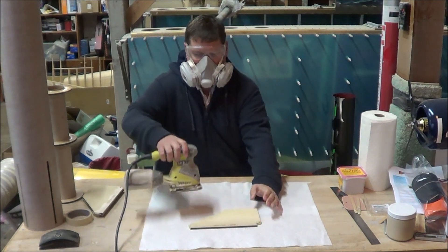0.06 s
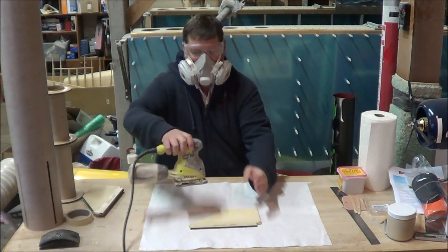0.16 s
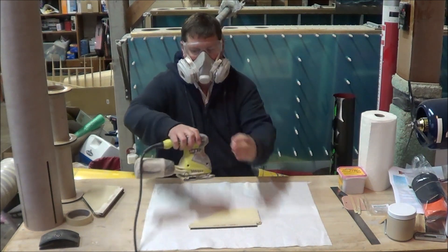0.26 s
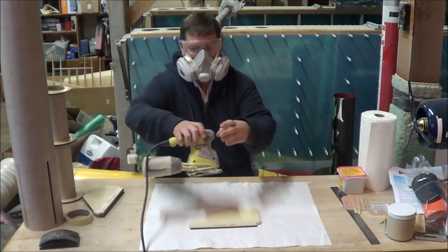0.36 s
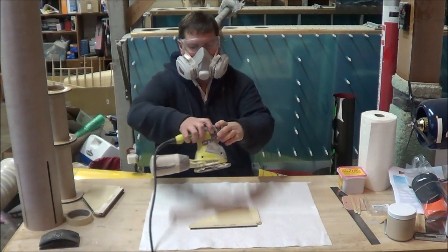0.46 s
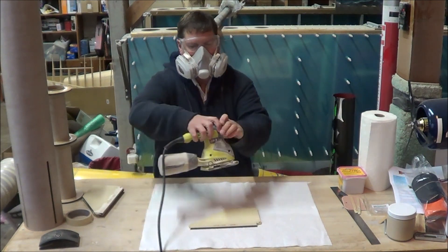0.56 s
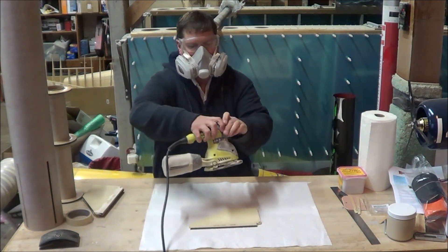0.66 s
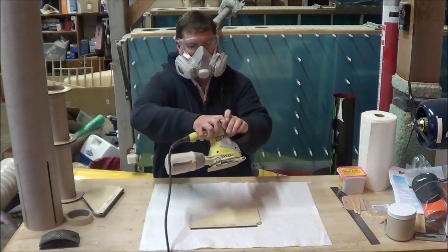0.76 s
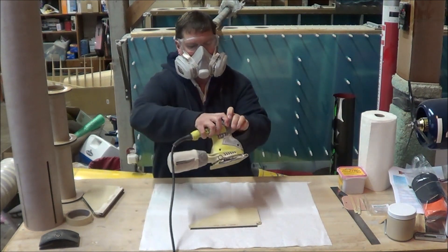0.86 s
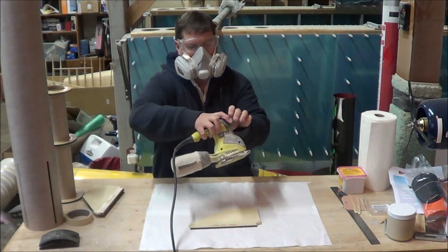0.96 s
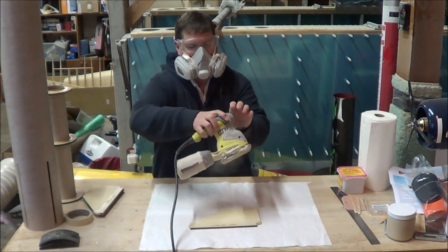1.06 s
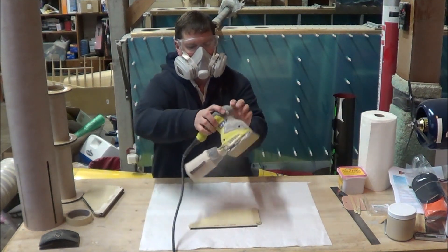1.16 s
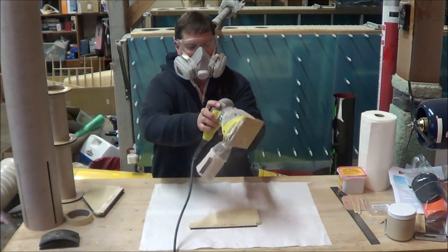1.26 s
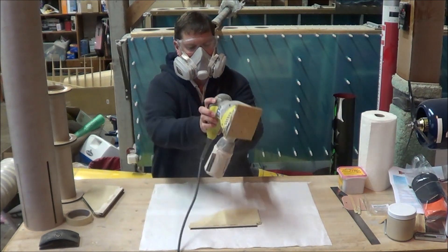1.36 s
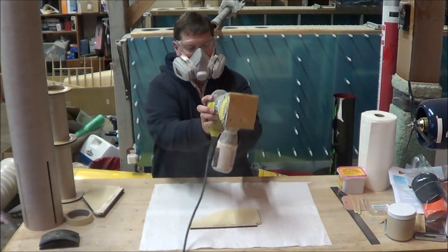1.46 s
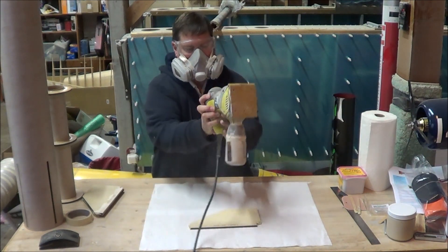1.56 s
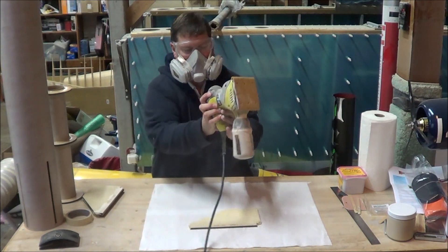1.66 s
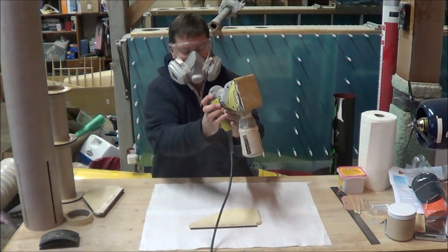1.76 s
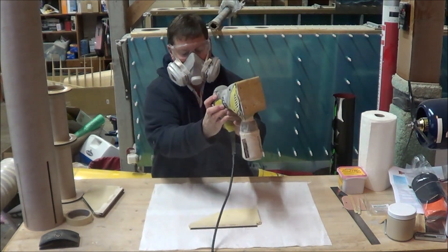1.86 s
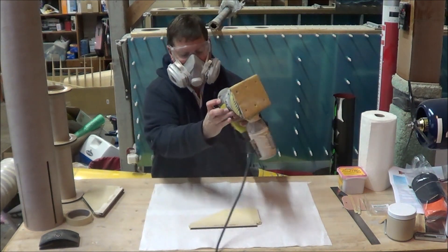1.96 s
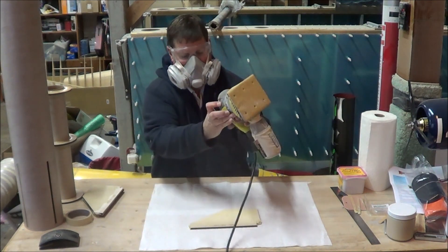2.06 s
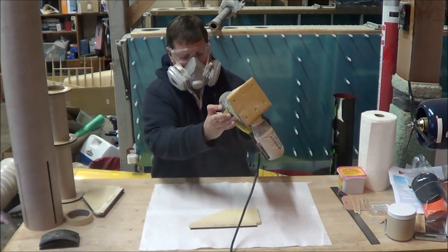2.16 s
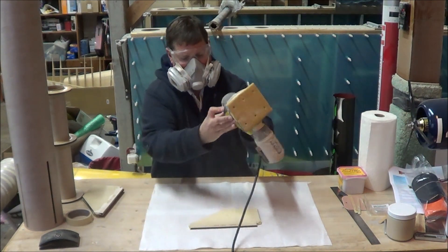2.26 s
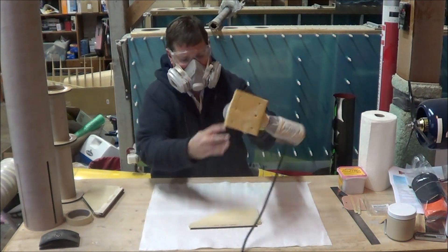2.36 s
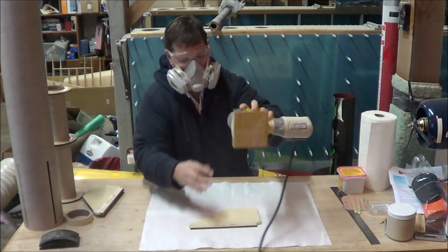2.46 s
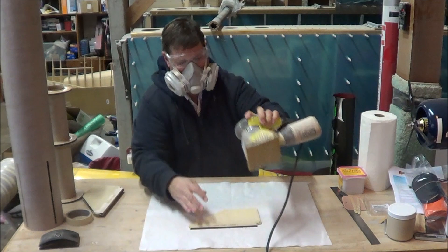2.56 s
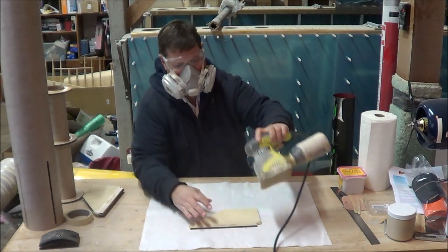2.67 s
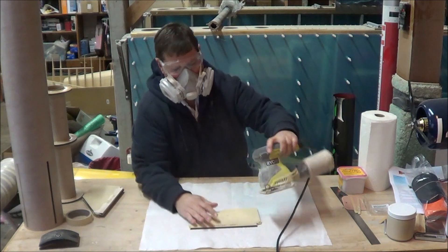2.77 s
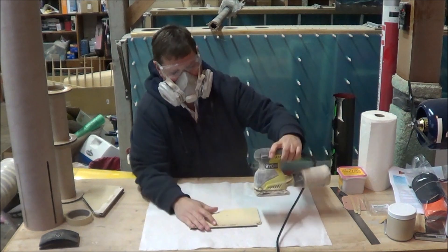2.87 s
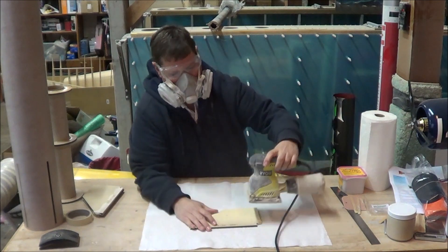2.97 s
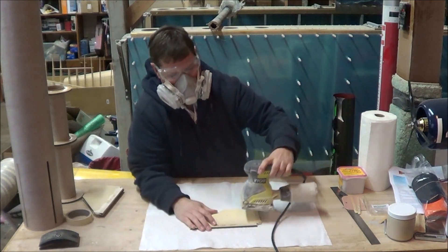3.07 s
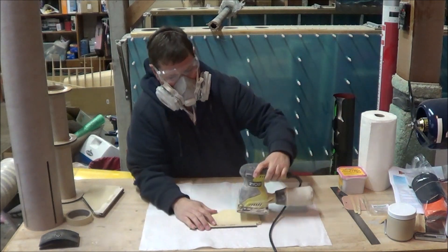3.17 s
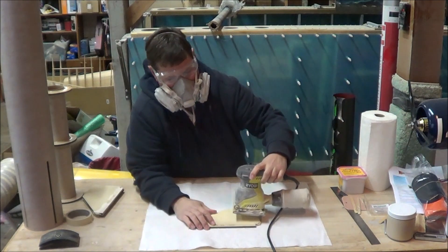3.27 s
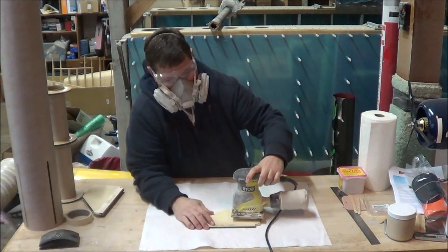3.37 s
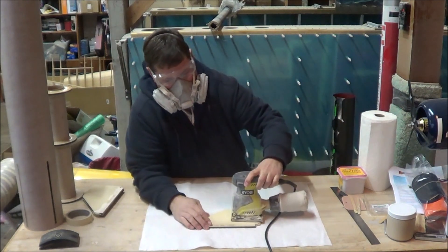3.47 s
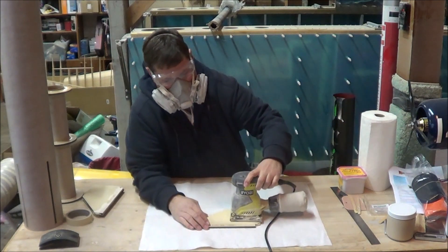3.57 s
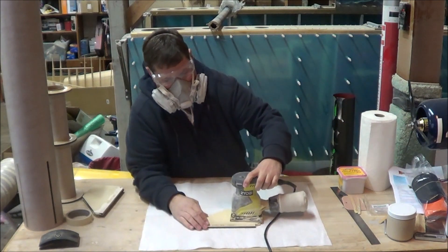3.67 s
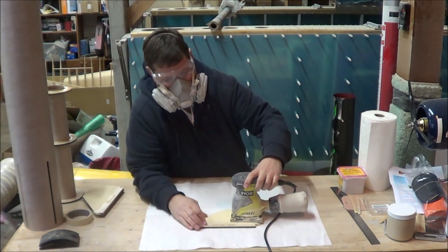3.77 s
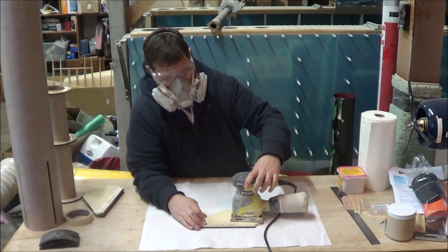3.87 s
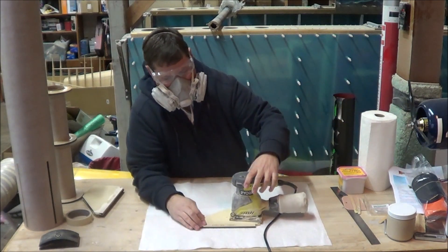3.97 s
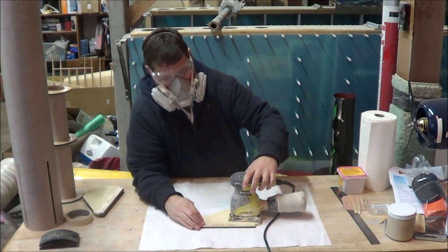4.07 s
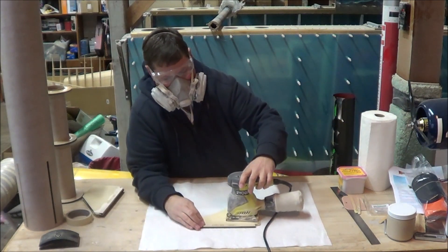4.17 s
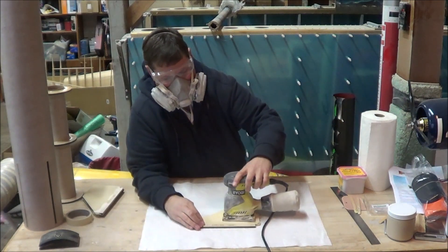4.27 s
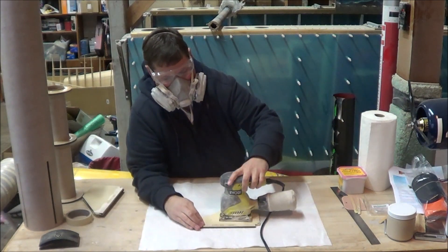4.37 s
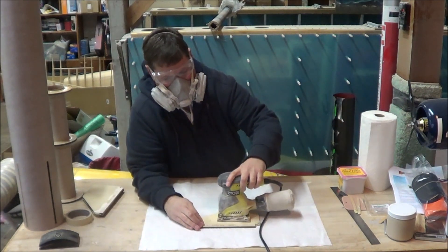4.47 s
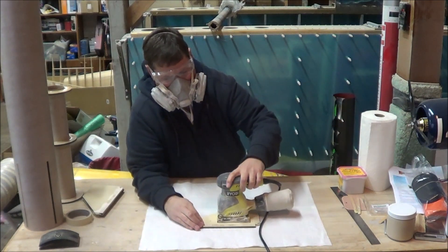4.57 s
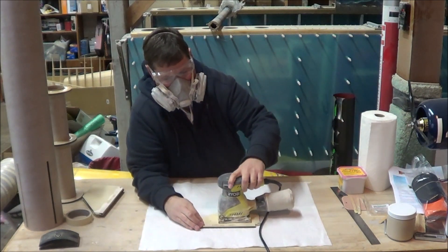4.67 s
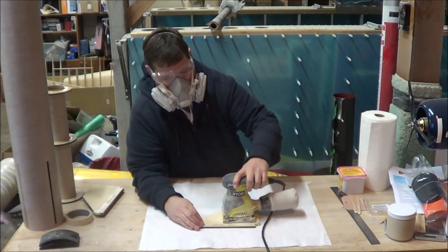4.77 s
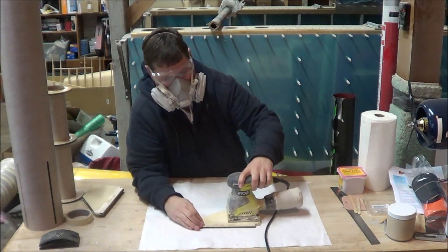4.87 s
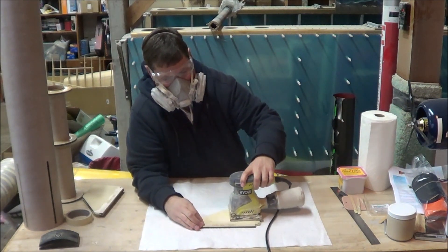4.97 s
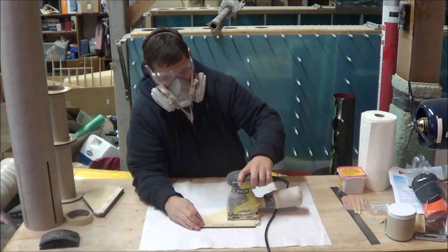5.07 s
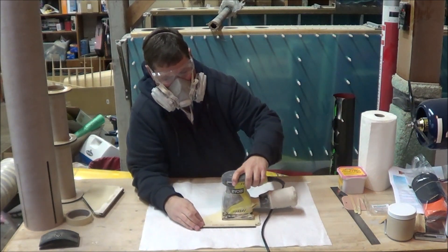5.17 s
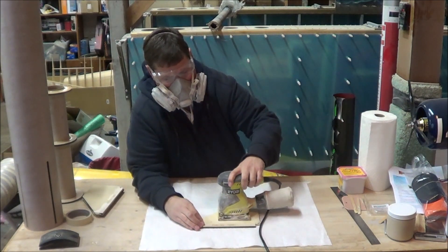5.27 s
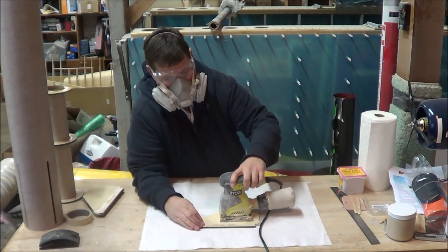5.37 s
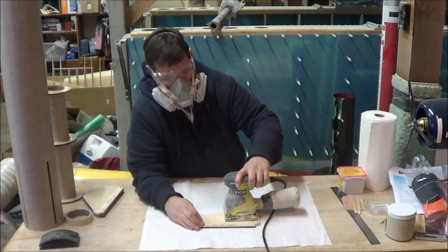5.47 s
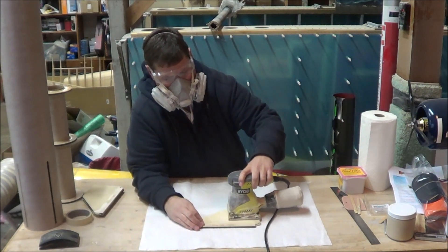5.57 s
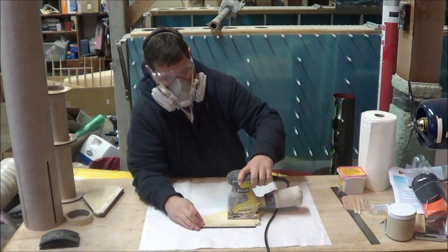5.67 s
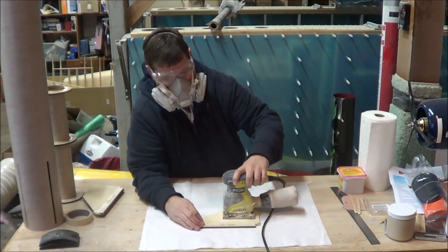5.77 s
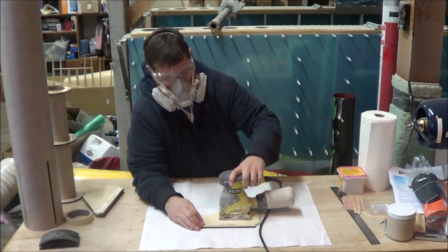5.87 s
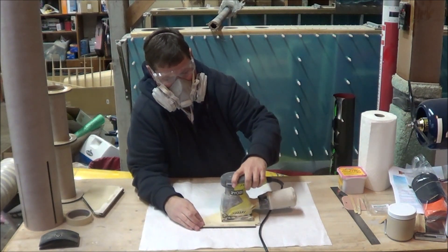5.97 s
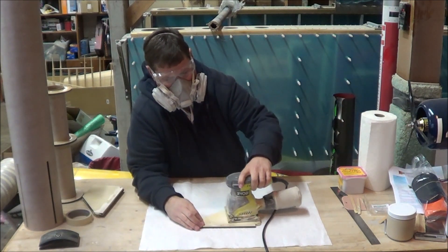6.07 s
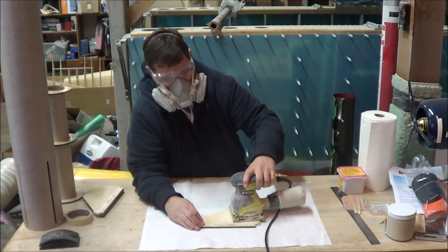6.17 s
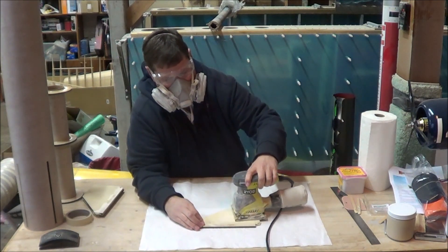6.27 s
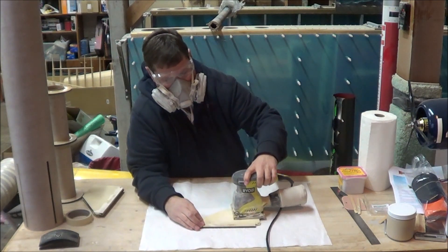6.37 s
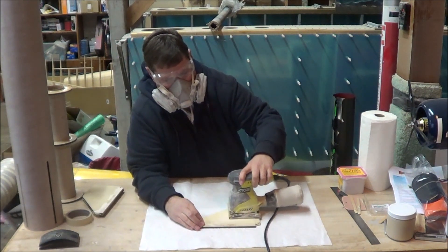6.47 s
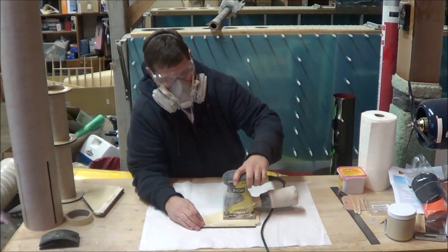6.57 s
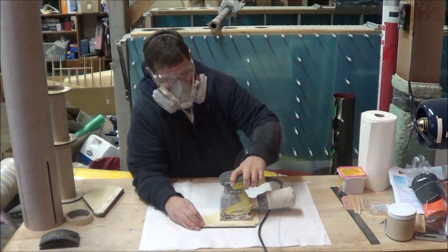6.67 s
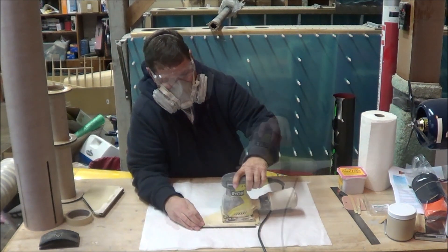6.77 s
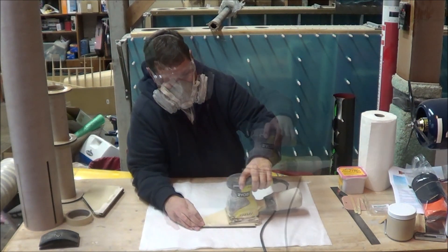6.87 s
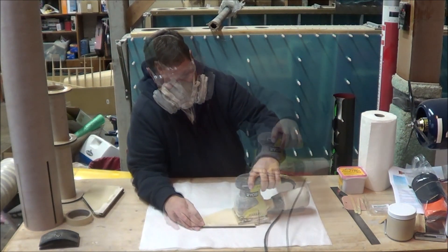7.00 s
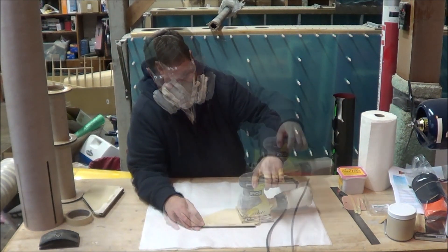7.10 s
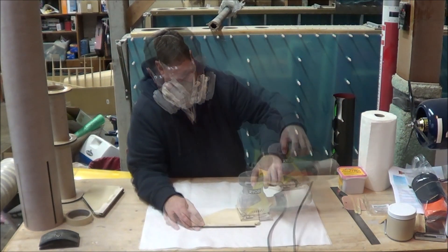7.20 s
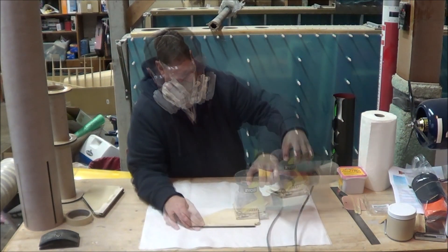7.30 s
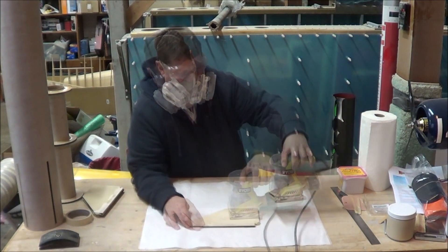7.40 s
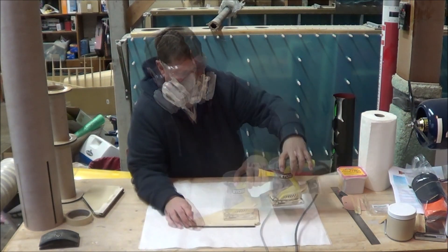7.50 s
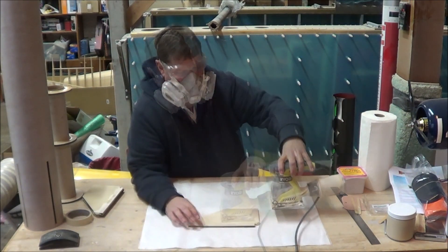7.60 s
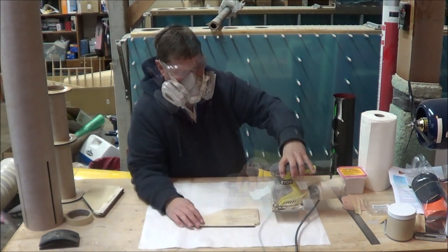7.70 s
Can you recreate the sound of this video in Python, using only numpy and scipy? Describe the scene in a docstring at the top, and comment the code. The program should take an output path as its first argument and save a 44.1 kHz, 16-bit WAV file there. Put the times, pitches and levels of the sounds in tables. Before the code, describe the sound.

For the first 0.8 seconds there is only faint, low workshop ventilation with mains hum and a very thin high electrical tone. At 0.83 a sharp plastic switch snap, with tiny trailing clicks, starts an electric orbital sander. Its motor whine sweeps upward fast, squealing briefly, and nears full speed by about 2 seconds: a loud buzzing drone with rushing fan air, hiss and pad rattle, tones swelling and dropping as the tool is turned. At 3.5 the paper catches wood with a rasping bite, and the sound becomes dense, gritty scouring over a low hum. The pitch sags slightly from 3.8 to 6 while the rasp gradually eases. At about 6.6 a second free-running sander layer abruptly overlaps; from 7.1 its power cuts and its whine slides downward, still turning at the end while sanding continues. Close stereo, short room reflections.

```python
"""In a workshop, an orbital sander is switched on, spins up in the air and is set down on a wooden board at 3.5
s. The off-centre pad hums and rattles, the motor's commutator whines, the fan blows, and the paper scours the
wood. Hums and whines are sine tones tied to the turning shaft; air, vents and scouring are coloured noise. From
6.6 s the sound of a sander running free overlaps the first; it is switched off and coasts down. Room
reflections and a faint background of ventilation and mains hum surround it."""
import sys
import numpy as np
from scipy import signal
from scipy.fft import rfft, irfft, next_fast_len
from scipy.io import wavfile
from scipy.ndimage import uniform_filter1d, map_coordinates

SR = 44100
rng = np.random.default_rng(int(sys.argv[2]) if len(sys.argv) > 2 else 0)


def to_wav(s):
    """Save 16-bit WAV."""
    ch = np.atleast_2d(s).T  # columns
    pcm = np.round(np.clip(ch, -1, 1) * 32767)  # PCM
    wavfile.write(sys.argv[1], SR, pcm.astype(np.int16))


N = 341334
T = np.arange(N) / SR  # time in seconds
PADDED = next_fast_len(N + 8192, True)  # transform length in samples, with room for filters to ring out

ON_S, TOUCH_S, SECOND_RUN_S, OFF_S = 0.83, 3.52, 6.575, 7.125  # switch-on, contact with wood, second run, its switch-off
FREE_HZ = 219.66  # shaft speed running free, turns per second
MAINS_HZ = 60


def first_run():
    """One shaft speed drives every layer: spin-up in the air, the pad turned up and back, then sanding."""
    # hum of pad and casing: shaft order [multiple of shaft speed],
    # level held up [dB], held level [dB], pressed on the wood [dB]; all at free speed
    pad_hum = [(1, -32, -27, -22), (2, -38, -33, -23), (3, -19.5, -19.8, -25), (4, -25, -33, -25.5),
               (6, -26, -33, -36), (7, -33.5, -26.5, -23), (8, -25.5, -32, -29)]
    hz = speed()
    turns, pace, regular = shaft(hz), hz / FREE_HZ, settled(hz)

    steady = ramp(1.614, 0.25)  # the pad stops flapping
    level = ramp(2.58, 0.18)  # the tool is turned from pad up to pad down
    load, pressed = ramp(TOUCH_S, 0.016), ramp(TOUCH_S, 1.07)
    # the brushes spark and skip while the motor draws its starting current
    current = 1 - settled(hz, from_hz=155, span_hz=32)
    rough = .025 + .06 * (1 - regular)

    orders = []
    for order, up_db, level_db, wood_db in pad_hum:
        held_db = blend(up_db, level_db, level)
        orders.append((order, blend(held_db, wood_db, pressed)))
    out = ramp(0.98, 0.19) * pace ** 3.23 * hum(turns, orders)
    out += undb(1.0) * ramp(1.29, .9) * buzz(turns, level, load, wander_db=2.5)
    out += ramp(1.0, 0.36) * armature(turns, -24.5 - 3.0 * load)
    out += ramp(0.93, 0.12) * whine(turns, current, load, rough) + squeal(hz)

    # air noise grows with speed and is stronger while the pad flaps
    rush_db = -16 + 5.5 * (1 - steady)
    air = pace ** 1.46 * undb(rush_db) * free_pad(turns, regular)
    # the vents face away most while the pad is held up
    vent_db = -24.5 - 3.5 * steady * (1.5 - level)
    hiss = pace ** 1.1 * undb(vent_db) * vents()
    out += (1 - load) * (air + hiss)

    # the scouring eases by 0.42 dB a second as the wood gets smoother; the hand presses unevenly
    scour_db = -16.5 - 0.42 * (T - TOUCH_S) + .5 * walk(2.89)
    out += load * undb(scour_db) * scour(turns) + bite()
    return out * ramp(ON_S, 0.0052)


def speed():
    """Shaft speed in Hz: the motor runs up, then sags as the hand leans on it."""
    quick_share, quick_s, slow_s = .688, .2312, .7852  # part of the run-up is quick, the rest slow
    since = np.maximum(T - 0.8166, 0)
    missing = blend(np.exp(-since / slow_s), np.exp(-since / quick_s), quick_share)
    sag_hz = 8.95 * np.sin(np.pi / 2 * ramp(3.829, 2.189))
    return FREE_HZ * (1 - missing) - sag_hz


def second_run():
    """The sander runs free; after the switch opens the rotor tone stops and it coasts with a falling whine."""
    # hum of the second run: shaft order [multiple of shaft speed], level powered [dB], coasting [dB]
    free_hum = [(1, -29, -34), (2, -27, -36), (3, -25, -20.5), (4, -30, -33)]
    hz = second_speed()
    turns, pace = shaft(hz), hz / FREE_HZ
    powered, coasting = 1 - ramp(OFF_S, 0.046), ramp(OFF_S, 0.31)

    out = hum(turns, [(order, blend(on_db, off_db, coasting)) for order, on_db, off_db in free_hum])
    out += undb(-1) * buzz(turns, 0.74, 0)
    out += powered * armature(turns, -26)
    whine_db = blend(0, -2, powered)
    out += undb(whine_db) * pace ** 2 * whine(turns, 0, 0, .04 + .06 * powered)
    air = free_pad(turns, 0.48 + 0.4 * powered) + undb(-11.5) * vents()
    out += undb(-14) * pace ** 0.88 * air
    return out * ramp(SECOND_RUN_S, 0.0015)


def second_speed():
    """Shaft speed in Hz: a slow climb under power, then friction brakes it."""
    entry_hz, climb_hz_per_s, coast_s = 219.15, 13.1, 2.26
    powered_hz = entry_hz + climb_hz_per_s * (np.minimum(T, OFF_S) - SECOND_RUN_S)
    return powered_hz * np.exp(-np.maximum(T - OFF_S, 0) / coast_s)


def shaft(hz, flutter=0.00062):
    """Turns made by a shaft whose speed flutters slightly."""
    return np.cumsum(hz * (1 + flutter * walk(45))) / SR


def settled(hz, from_hz=160, span_hz=45):
    """Near full speed the pad falls into a regular orbit and noise turns into lines: 0 to 1."""
    return np.clip((hz - from_hz) / span_hz, 0, 1)


def hum(turns, levels, waver_db=0.91):
    """The off-centre pad shakes the whole tool at low shaft orders, given as (order, dB); higher ones waver more."""
    out = 0
    for order, db in levels:
        waver = waver_db * np.sqrt(order) * walk(10)
        out = out + tone(order * turns, db + swell(order) + waver)
    return out


def buzz(turns, level_share, load, wander_db=1.5):
    """Middle orders of the casing; each swells and fades as the tool moves through the room's standing waves."""
    # buzz of the casing: shaft order [multiple of shaft speed],
    # base level held up [dB], held level [dB], on the wood [dB]
    casing_lines = [(5, -35, -41, -33), (9, -28, -32.5, -31.5), (10, -31, -28, -29.5),
                    (11, -38, -35.5, -29), (13, -26.5, -40, -43), (14, -29, -34, -37), (15, -34, -32, -34),
                    (16, -33.5, -30, -33.5), (17, -31.5, -35, -42), (18, -26, -30, -41),
                    (19, -33.5, -33, -54), (20, -31.5, -42, -67), (21, -34, -36, -45.5),
                    (22, -27.5, -34.5, -36)]
    out = 0
    for order, up_db, level_db, wood_db in casing_lines:
        db = blend(blend(up_db, level_db, level_share), wood_db, load)
        out = out + tone(order * turns, db + swell(order) + wander_db * (walk(4.5) - .5))
    return out


def swell(order):
    """Decibels by which one shaft order swells or drops out as the tool moves."""
    # brief level changes of single tones: centre t/s, length/s, shaft order [multiple of shaft speed], change/dB
    changes = [(1.02, .08, 36, 5.5), (1.188, 0.07, 48, 4), (1.306, 0.21, 3, -9), (1.47, 0.16, 7, 17.5),
               (1.738, 0.13, 1, -12), (1.893, 0.18, 8, 5), (2.054, 0.16, 6, 7), (2.22, 0.24, 20, 7),
               (2.397, .55, 4, -13), (2.52, .16, 8, 6), (2.526, .2, 1, -13), (4.07, 0.22, 24, 8.5),
               (4.17, 0.22, 7, 3.5), (4.3, 0.66, 1, -4), (4.55, 0.59, 23, 9.5), (4.524, 0.35, 7, -13),
               (4.998, 0.52, 7, -4.5), (7.32, 0.18, 4, 4.5), (7.4, 0.16, 23, 6)]
    total_db = 0
    for centre_s, length_s, changed_order, db in changes:
        if changed_order == order:
            total_db = total_db + db * np.exp(-(2 * (T - centre_s) / length_s) ** 4)
    return total_db


def armature(turns, db):
    """Twelve rotor slots sing; twice a mains cycle the pull makes the tone both louder and sharper."""
    slots, depth, bend = 12, .24, .14  # bend is in cycles of the tone
    mains = 2 * np.pi * 2 * MAINS_HZ * T
    note = tone(slots * turns - bend * np.cos(mains), db + 2 * walk(3.376))
    return note * (1 + depth * np.sin(mains))


def whine(turns, current, load, rough):
    """Brushes skip over the commutator bars; rough smears their lines, which flare as they cross a housing resonance."""
    # commutator lines before the housing rings: shaft order [multiple of shaft speed],
    # level under the starting current [dB], running free [dB], on the wood [dB]
    bar_lines = [(23, -35, -32, -38), (24, -27, -36, -37), (36, -30, -41.5, -47), (46, -38, -36, -42),
                 (48, -30.5, -38, -37)]
    # ringing of the motor housing: f/Hz, width/Hz, level/dB
    housing = [(2600, 230, 8), (4850, 600, -4), (7060, 340, 5.5)]
    lines = 0
    for order, start_db, free_db, wood_db in bar_lines:
        db = blend(blend(free_db, wood_db, load), start_db, current)
        skipping = order * turns + rough * walk(380)
        lines = lines + tone(skipping, db + swell(order) + 1.8 * walk(9))
    return ring(lines, housing)


def squeal(shaft_hz, hz=2670, width_hz=210, reach_hz=135):
    """Sparking brushes ring the main mode of the housing, most when a commutator line sweeps through it."""
    # commutator lines that make the housing squeal: shaft order [multiple of shaft speed],
    # strength when right on the mode [dB]
    squeal_lines = [(36, -24), (24, -15.5)]
    mode = signal.iirpeak(hz, hz / width_hz, SR)
    sparks = signal.lfilter(*mode, signal.lfilter(*mode, rng.standard_normal(N)))
    flare = 0
    for order, db in squeal_lines:
        distance = (order * shaft_hz - hz) / reach_hz
        flare = flare + undb(db) / (1 + distance ** 2)
    starting = undb(-31) * (1 - settled(shaft_hz, 125, 37))
    return ramp(ON_S, 0.11) * (flare + starting) * unit(np.tanh(unit(sparks)))


def free_pad(turns, regular):
    """Air and rattle of the sander held off the wood; a regular orbit calms the air and brings out the rattle."""
    return undb(-4 * regular) * fan(turns) + undb(-8.5) * regular * rattle(turns)


def fan(turns, chop=0.22, spark=.14):
    """Cooling air and brush hiss, chopped by the shaft and by the mains."""
    # colour of the moving air: f/Hz, level/dB
    air_colour = [(40, -46), (110, -31), (300, -21), (520, -7.5), (900, -4.5), (2100, -1), (3400, -3),
                  (4300, -5.5), (5900, -7), (7000, -4.5), (9000, -14.5), (12000, -14.5), (15000, -34)]
    by_shaft = 1 + chop * np.sin(2 * np.pi * turns)
    by_mains = 1 + spark * np.sin(2 * np.pi * 2 * MAINS_HZ * T)
    flicker = undb(1.2 * walk(40))
    return unit(colour(rng.standard_normal(N) * by_shaft * by_mains * flicker, air_colour))


def rattle(turns, count=4):
    """The free pad clatters in the same way on every turn, and the pattern slowly changes."""
    # colour of the clatter: f/Hz, level/dB
    clatter_colour = [(2000, 5), (5300, 3), (6500, 6.5), (8500, -5.5), (11000, -2.5), (13000, -17),
                      (15000, -15)]
    size, lowest, highest = 4096, 25, 70  # points in one turn, range of shaft orders
    out = 0
    for _ in range(count):
        orders = np.zeros(size // 2 + 1, complex)
        orders[lowest:highest] = np.exp(2j * np.pi * rng.random(highest - lowest))
        one_turn = irfft(orders)
        out = out + walk(4) * np.interp(turns % 1 * size, np.arange(size), one_turn)
    out = colour(out, clatter_colour)
    # hold the loudness even over tenths of a second
    return out / np.sqrt(np.abs(uniform_filter1d(out ** 2, SR // 10)) + 1e-12)


def vents(flutter_db=2.0):
    """Thin, fluttering hiss of the air outlets."""
    # colour of the hiss: f/Hz, level/dB
    hiss_colour = [(3000, -14), (7000, -0.5), (9000, 0.5), (11200, -3.5), (13000, -12), (14200, -15),
                   (15800, -12)]
    return unit(colour(rng.standard_normal(N), hiss_colour)) * undb(flutter_db * walk(14))


def scour(turns, grain_db=2.0, stroke=0.081, flicker_db=0.62):
    """Countless grits tear at the wood, hardest once in each orbit of the pad."""
    # colour of sanded wood: f/Hz, level/dB
    wood_colour = [(40, -36), (110, -21.5), (300, -18), (520, -6), (1300, -3.5), (2100, -2), (3350, -1.5),
                   (4200, -7), (5800, -9), (7600, -4.5), (9300, -8), (11300, -5), (12700, -10),
                   (14200, -18.5), (15800, -17.5)]
    grain = np.minimum(rng.exponential(size=N), 5)
    grits = rng.standard_normal(N) * undb(grain_db * grain)
    force = (1 + stroke * np.sin(2 * np.pi * turns)) * undb(flicker_db * walk(30))
    return unit(colour(grits * force, wood_colour))


def bite():
    """The edge of the paper catches the board, then rasps on until the rough surface is worn smooth."""
    # colour of the rasp: f/Hz, level/dB
    rasp_colour = [(150, -22), (700, -2), (1600, 1), (3200, 3.5), (4500, -5), (12000, -25)]
    since = np.abs(T - TOUCH_S)
    catch = undb(-15) * np.exp(-since / 0.092)
    rasp = undb(-25.5) * np.exp(-since ** 2)
    flicker = undb(1.4 * walk(60))
    return ramp(TOUCH_S, 0.032) * (catch + rasp) * flicker * unit(colour(rng.standard_normal(N), rasp_colour))


def switch():
    """Short plastic snaps of the trigger and closing contacts, over the lingering ring of its spring."""
    # snaps: t/s, starting level/dB, fading time/s
    snaps = [(0.8299, -9.5, .0013), (0.835, -21, .001), (0.847, -26, .001), (0.861, -24, .001),
             (0.8645, -19, .0006), (0.871, -18, .001)]
    # colour of the plastic: f/Hz, level/dB
    snap_colour = [(500, -25), (3500, -18), (5200, 1), (7600, -1), (8800, -11), (11000, -20), (15000, -34)]
    bursts = sum(undb(db) * (T >= s) * np.exp(-np.abs(T - s) / fade_s) for s, db, fade_s in snaps)
    since = T - snaps[0][0]
    tail = undb(-25) * (since > 0) * np.exp(-np.abs(since) / 0.036)
    return (bursts + tail) * unit(colour(rng.standard_normal(N), snap_colour))


def ports(x):
    """The two microphone ports hear the sound with different level and phase, most of all in the low notes."""
    # level between the ports: f/Hz, left minus right [dB]
    level_gap = [(60, 0), (110, -.5), (200, -5), (380, -4), (700, -3), (1290, -2), (2400, -1.5),
                 (4400, -1.5), (8000, -.3), (11000, 0)]
    # phase between the ports: f/Hz, lead of the left [radians]
    phase_gap = [(60, 0), (200, -1.0), (400, -.9), (780, -.55), (1900, -.25), (4300, -.1), (7000, 0)]
    # each port takes half of the difference
    half = undb(on_bins(level_gap) / 2) * np.exp(.5j * on_bins(phase_gap))
    pair = np.array([half, 1 / half])
    return irfft(rfft(x, PADDED) * pair / np.abs(pair.mean(axis=0)), PADDED)[:, :N]


def room(x, t60=0.61):
    """Short reflections from bench and shelves, dying by 60 dB in t60 seconds; the side part fades in the treble."""
    t = T[:SR // 2]
    tails = rng.standard_normal((2, len(t))) * undb(-60 * t / t60) * (t > .004)
    mid, side = (signal.fftconvolve(x, h / np.linalg.norm(h))[:N] for h in tails)
    # both colours: (Hz, dB)
    mid = colour(mid, [(700, -30), (1700, -9), (3500, 0)])
    side = colour(side, [(200, -14), (600, -5), (1200, 0), (5000, 1), (8000, -1), (10500, -6), (12500, -24)])
    return undb(-9) * mid + undb(-11) * side * np.array([[1], [-1]])


def workshop():
    """Distant ventilation as wavering wide noise, with mains hum and other faint tones, under everything."""
    # colour of the ventilation: f/Hz, level/dB
    air_colour = [(25, -13), (60, -17), (150, -8), (200, 1.5), (450, 1.5), (800, -1), (1500, -8),
                  (3000, -13.5), (6500, -17), (10000, -19), (14000, -26)]
    # lasting faint tones, the highest a thin, high whistle: f/Hz, average level/dB
    shop_tones = [(59, -62), (202, -54), (441.4, -54), (764.4, -58), (1071, -59), (15734, -56)]
    mid, side = (unit(colour(rng.standard_normal(N), air_colour)) for _ in range(2))
    air = mid + undb(-10) * side * np.array([[1], [-1]])
    air = air * undb(-38.2 + .5 * walk(5.5))
    return air + sum(tone(hz * T, db + 1.7 * walk(4.3)) for hz, db in shop_tones)


def undb(db):
    """Decibels to gain."""
    return 10 ** (np.asarray(db) / 20)


def unit(x):
    """Scale to rms (average strength) 1."""
    return x / np.sqrt(np.mean(x ** 2))


def ramp(start, length):
    """From 0 to 1 over length seconds."""
    return np.clip((T - start) / length, 0, 1)


def blend(a, b, share):
    """From a to b as share goes from 0 to 1."""
    return a + share * (b - a)


def walk(rate):
    """Smooth chance with spread near 1, led through rate random points a second."""
    knots = rng.standard_normal(4096)
    # worked out at every 32nd sample and held in between
    return map_coordinates(knots, [T[::32] * rate + 2], order=3, mode="wrap").repeat(32)[:N]


def tone(turns, db):
    """A sine at rms level db that follows a count of cycles."""
    return np.sqrt(2) * undb(db) * np.sin(2 * np.pi * (turns + rng.random()))


def on_bins(points):
    """A (Hz, value) table read at every frequency of a padded transform."""
    hz, value = np.transpose(points)
    return np.interp(np.log(np.fft.rfftfreq(PADDED, 1 / SR) + 1), np.log(hz), value)


def colour(x, points):
    """Filter a sound by the curve of a (Hz, dB) table."""
    return irfft(rfft(x, PADDED) * undb(on_bins(points)), PADDED)[..., :N]


def ring(x, modes):
    """Add the resonances of a (Hz, width Hz, dB) table to a sound."""
    out = x
    for hz, width_hz, db in modes:
        out = out + undb(db) * signal.lfilter(*signal.iirpeak(hz, hz / width_hz, SR), x)
    return out


def scene():
    """Sander and switch in the workshop; the background sinks by up to 5 dB while the tool is loud."""
    tool = first_run() + second_run() + switch()
    power = np.abs(uniform_filter1d(tool ** 2, SR // 5))
    duck = undb(-5 * power / (power + .01))
    return ports(tool) + room(tool) + duck * workshop()


def record(dry):
    """Peaks are clipped at full scale, then a steep low-pass removes the treble above 15.9 kHz."""
    low_pass = signal.ellip(10, .1, 70, 15900, fs=SR, output="sos")
    return signal.sosfilt(low_pass, np.clip(dry, -1, 1))


dry = scene()
out = record(dry)
to_wav(out)
```